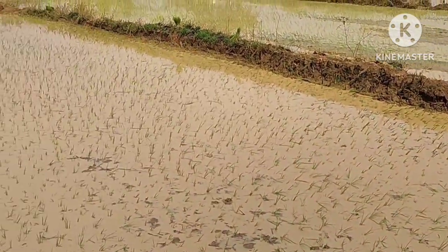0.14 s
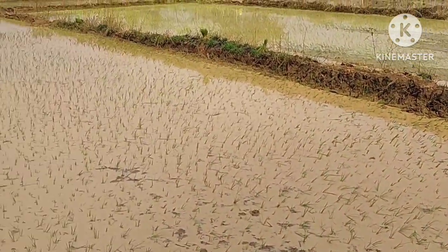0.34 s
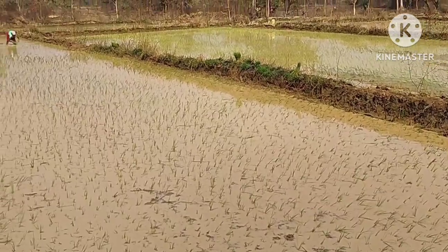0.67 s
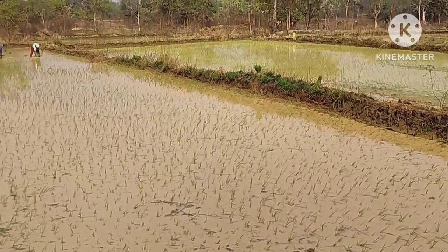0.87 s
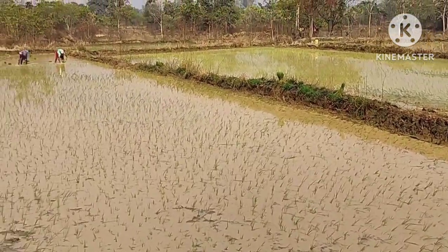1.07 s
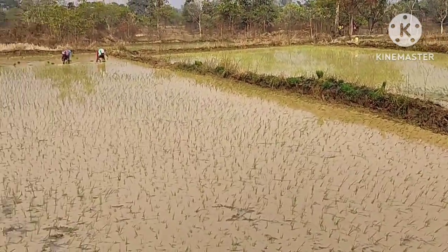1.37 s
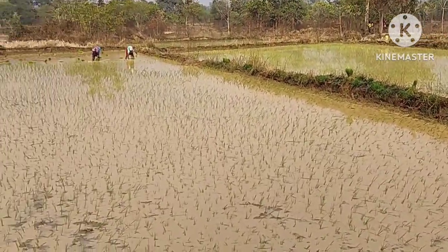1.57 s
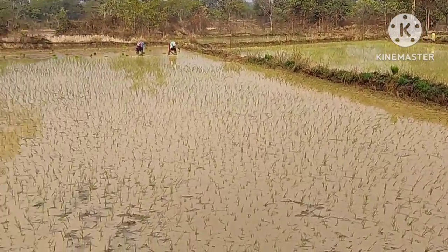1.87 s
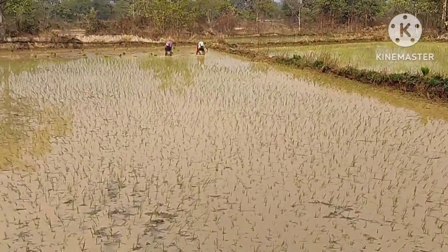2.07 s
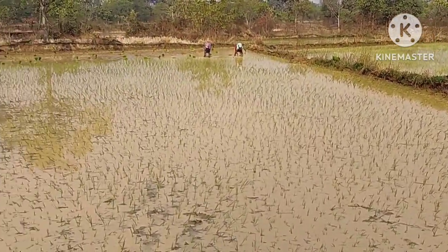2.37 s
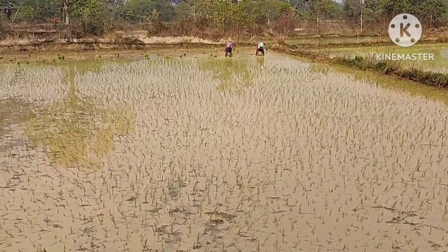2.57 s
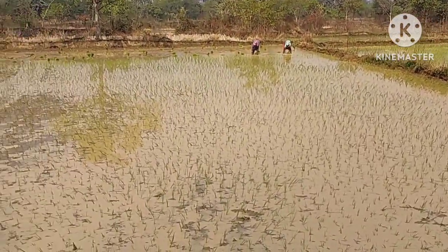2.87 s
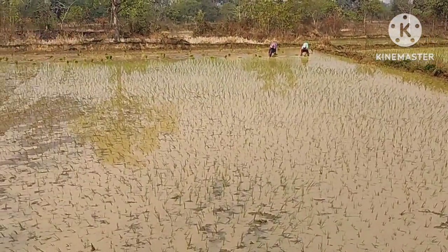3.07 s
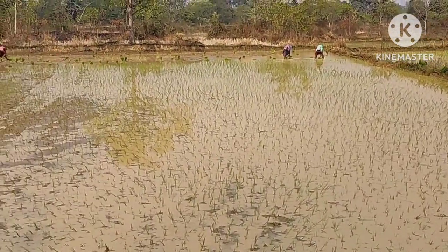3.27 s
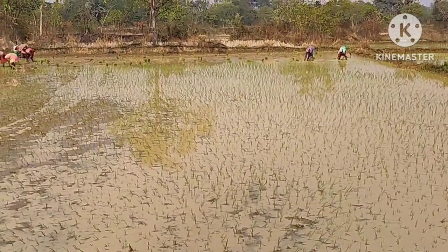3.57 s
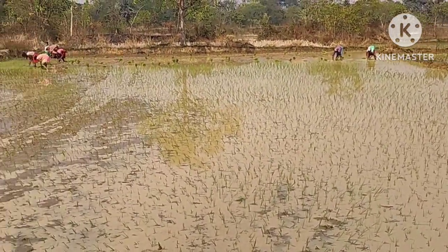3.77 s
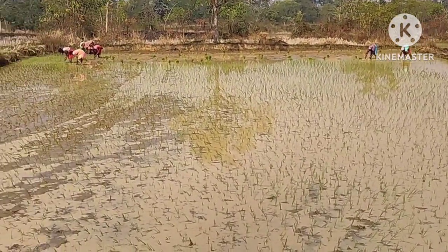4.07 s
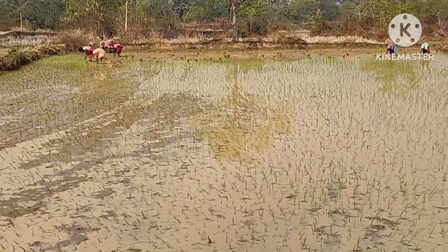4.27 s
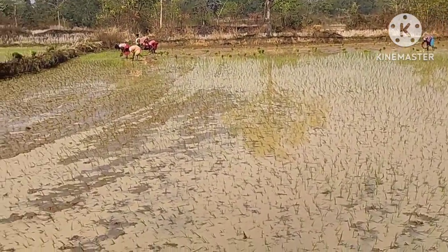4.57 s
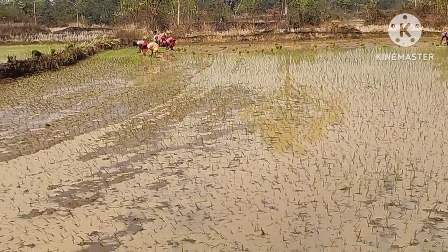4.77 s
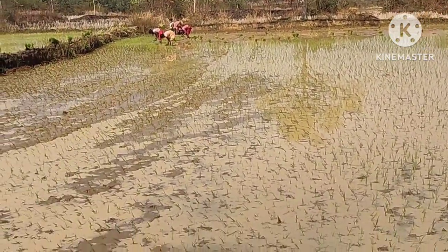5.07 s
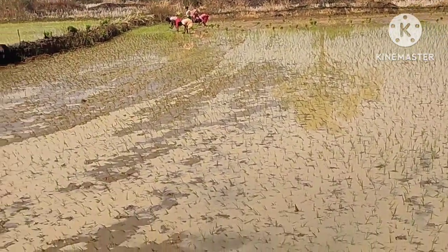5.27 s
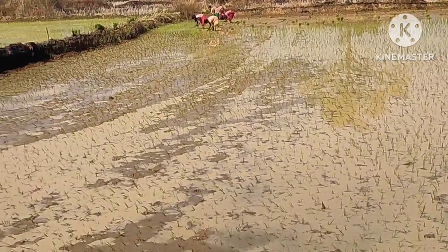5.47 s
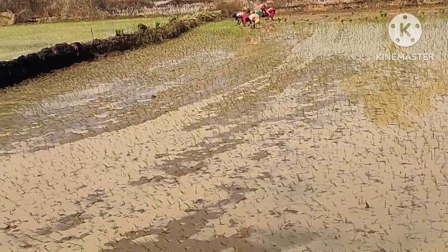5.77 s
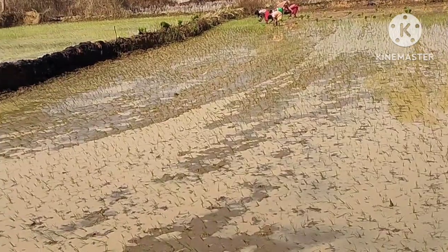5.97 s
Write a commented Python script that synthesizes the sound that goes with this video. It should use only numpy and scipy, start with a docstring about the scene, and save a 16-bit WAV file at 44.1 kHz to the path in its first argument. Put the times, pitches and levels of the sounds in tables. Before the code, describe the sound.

A small diesel engine chugs some way off across open fields, a rapid, even beat of metallic knocks and exhaust thumps. As the microphone slowly turns, the clatter grows a little louder and brighter on the right. Close by are low air, fine hiss and a few small ticks. Faint chirps and one hoarse squawk, probably birds, come from farther off, and a short snap follows about two thirds through.

```python
"""Diesel across flooded fields

A single-cylinder diesel chugs some way off, about 14 firings a second: a metallic knock, then an exhaust
thump with a gassy rasp, and a short tail scattered by the land. The microphone pair turns slowly, so the
clatter brightens on the right. Close by, over low air and fine hiss: a few ticks, a faint sizzle, one
snap, a soft bump of air. Farther off, thin chirps and a hoarse squawk, probably birds."""
import sys
import numpy as np
from scipy import signal
from scipy.fft import rfft, irfft, next_fast_len
from scipy.io import wavfile
from scipy.ndimage import uniform_filter1d

SR = 44100
rng = np.random.default_rng(int(sys.argv[2]) if len(sys.argv) > 2 else 0)


def unload_wav(signal):
    """Save mono or channel-first audio to the path in sys.argv[1] as 16-bit WAV at rate SR, clipped to [-1, 1]."""
    wavfile.write(
        sys.argv[1],
        SR,
        np.round(np.clip(np.atleast_2d(signal).T, -1, 1) * 32767).astype(np.int16),
    )


N = 270333
TIME = np.arange(N) / SR

# spectrum of the fine hiss: (frequency [Hz], relative level [dB])
HISS_SPECTRUM = [(2000, 6), (3500, 3), (5500, -1.5), (7200, 0), (8800, 3), (10500, 1), (15000, -1)]
# the hiss at the right microphone: (time [s], level [dB])
HISS_LEVEL = [(0, -82.5), (1.8, -75.5), (2.6, -78.5), (3.2, -74), (4.25, -75.5), (4.42, -71), (5.1, -75.5),
              (6.13, -72)]


def amp(db):
    """Decibels to gain."""
    return 10 ** (np.asarray(db) / 20)


def unit(x):
    """Scales to rms 1."""
    return x / np.sqrt(np.mean(x ** 2) + 1e-20)


def bell(x, spread):
    """A Gaussian of height 1 around zero."""
    return np.exp(-.5 * (x / spread) ** 2)


def wander(samples):
    """Random drift of rms 1, smoothed over so many samples."""
    return unit(uniform_filter1d(rng.standard_normal(N), size=samples))


def curve(rows):
    """Joins (time, value) rows by straight lines."""
    return np.interp(TIME, *np.transpose(rows))


def colour(x, points):
    """Filters by (frequency [Hz], gain [dB]) points on a log axis, rolling off above the last."""
    hz, db = np.transpose(points)
    size = next_fast_len(N + 4096)
    f = np.fft.rfftfreq(size, 1 / SR)
    gain = amp(np.interp(np.log(f + 1), np.log(hz), db)) / np.maximum(f / hz[-1], 1) ** 2
    return irfft(rfft(x, size) * gain, size)[..., :N]


def ring(x, hz, width):
    """One resonance of gain 1."""
    r = np.exp(-np.pi * width / SR)
    return signal.lfilter([1 - r, 0, r - 1], [1, -2 * r * np.cos(2 * np.pi * hz / SR), r * r], x)


def body(x, modes):
    """A set of resonances driven together."""
    return unit(sum(amp(db) * ring(x, hz, width) for hz, width, db in modes))


def clicks(times, sizes):
    """A train of single impulses."""
    at = np.round(times * SR).astype(int)
    inside = (at >= 0) & (at < N)
    return np.bincount(at[inside], sizes[inside], N)


def swing(centre, spread, hz, sag=0, crest=0):
    """A few rounded cycles that rise and fade, their pitch falling by sag [Hz/s]."""
    t = np.arange(SR // 16) / SR - centre
    return bell(t, spread) * np.cos(2 * np.pi * (hz * (t - crest) - .5 * sag * (t - crest) ** 2))


def struck(start, db, hz, decay, rise=.00026):
    """One ringing blow."""
    t = np.arange(SR // 8) / SR
    blow = amp(db) * np.exp(-t / decay) * (1 - np.exp(-t / rise)) * np.sin(2 * np.pi * hz * t)
    return np.pad(blow, (round(start * SR), N))[:N]


def swell(centre, spread, hz, slide, db):
    """A tone that rises and fades smoothly while its pitch slides [Hz/s]."""
    t = TIME - centre
    return amp(db) * bell(t, spread) * np.sin(2 * np.pi * (hz * TIME + .5 * slide * t ** 2))


def pair(x, left_db, lag=0):
    """Two microphones: the left one hears the sound at its own level, lag seconds later."""
    return np.array([amp(left_db) * np.interp(TIME - lag, TIME, x), x])


def flutter(x, depth_db):
    """Sound paths over the water interfere: narrow bands swell and fade from stroke to stroke."""
    bands = signal.stft(x, nperseg=1024, noverlap=768)[2]
    drift = rng.standard_normal(bands.shape)
    for _ in range(2):
        drift = uniform_filter1d(uniform_filter1d(drift, size=3, axis=0), size=11, axis=1)
    gain = amp(depth_db * np.clip(unit(drift), -2, 2))
    return signal.istft(bands * gain, nperseg=1024, noverlap=768)[1][:N]


def turned(x, heading, spectra):
    """A turning microphone: crossfades x through one (spectrum, level [dB]) for each of headings 0-2."""
    shares = [np.sqrt(np.maximum(1 - abs(heading - k), 0)) for k in range(len(spectra))]
    return sum(share * amp(db) * unit(colour(x, points)) for share, (points, db) in zip(shares, spectra))


def firings(first_cycle=.2994, jitter_s=.00017):
    """Moments of combustion, from one before the start; each is a little early or late."""
    # engine speed: (time [s], firing rate [1/s])
    speed = [(0, 14.266), (.55, 14.311), (2.7, 13.789), (3.2, 14.066), (4.3, 14.038), (4.75, 13.883),
             (5.3, 14.012), (6.13, 13.84)]
    cycles = np.cumsum(curve(speed)) / SR - first_cycle
    times = np.interp(np.arange(int(cycles[-1]) + 1), cycles, TIME)
    times = np.r_[2 * times[0] - times[1], times]
    return times + jitter_s * rng.standard_normal(len(times))


def uneven(times, spread_db):
    """No two firings are equally strong."""
    return amp(spread_db * rng.standard_normal(len(times)))


def bursts(times, exhaust_delay=.01595):
    """Envelope of the noise in each cycle: the knock, the opening exhaust valve, their scattered tail."""
    knock_rise, knock_decay = .0006, .03
    exhaust_rise, exhaust_decay, tail_decay = .0014, .0068, .065
    t = np.arange(SR // 5) / SR
    late = np.maximum(t - exhaust_delay, 0)
    knock = .58 * np.exp(-t / knock_decay) * (1 - np.exp(-t / knock_rise))
    exhaust = np.hypot(1.4 * np.exp(-late / exhaust_decay), .27 * np.exp(-late / tail_decay))
    exhaust *= 1 - np.exp(-late / exhaust_rise)
    train = clicks(times, uneven(times, spread_db=1.1))
    power = signal.oaconvolve(train, knock ** 2 + exhaust ** 2)[:N]
    return unit(np.sqrt(np.maximum(power, 0)))


def piston_knock(times, gate, heading, shade):
    """The piston slaps the block a few times in a row, a pitched tock; the block rings on faintly."""
    # blows in one knock: (delay [s], spread [s], pitch [Hz], relative level [dB], extra in shade [dB])
    blows = [(.0022, .0011, 1340, -2, -6), (.0066, .0024, 1015, 0, 5), (.0105, .0013, 1430, -8, -2)]
    # engine block resonances: (frequency [Hz], width [Hz], gain [dB])
    block_modes = [(1002, 40, 8), (1330, 38, -20)]
    slaps = np.zeros(N)
    for delay, spread, hz, db, shade_db in blows:
        train = clicks(times, uneven(times, spread_db=1.6))
        slaps += amp(db + shade_db * shade) * signal.oaconvolve(train, swing(delay, spread, hz))[:N]
    block = body(gate * rng.standard_normal(N), block_modes)
    dip = bell(heading - 1, spread=.37)  # weaker at the oblique heading, most of all on the left
    knock = amp(.5 * shade - 2.5 * dip) * unit(unit(slaps) + .3 * block)
    return pair(knock, left_db=-6 - 14 * dip, lag=.00033)


def exhaust_pipe(times, gate):
    """Gas pulses and their turbulence ring the pipe; scattered sound fills the gaps."""
    # gas pulses in one cycle: (delay [s], gain [ratio])
    puffs = [(.0002, 0.63), (.0085, 0.61), (0.0175, 1), (0.0313, 0.9), (.0445, 0.22), (0.0597, 0.77)]
    # pipe resonances: (frequency [Hz], width [Hz], gain [dB])
    pipe_modes = [(360, 26, 1.5), (446, 48, -1.5), (547, 60, -9)]
    pulses = unit(sum(clicks(times + delay, gain * uneven(times, spread_db=2)) for delay, gain in puffs))
    turbulence = .35 * (gate + 1) * rng.standard_normal(N)
    ringing = body(flutter(pulses + turbulence, depth_db=1.5), pipe_modes)
    spectrum = [(100, -22), (250, -7), (330, 1.5), (520, 2.5), (700, -22.5), (1200, -14)]
    return pair(unit(colour(ringing, spectrum)), left_db=.5, lag=.00049)


def grit(times, alike, count=12):
    """Noise that partly repeats from firing to firing; the pattern drifts as the echo paths change."""
    last_firing = times[np.searchsorted(times, TIME, "right") - 1]
    age = ((TIME - last_firing) * SR).astype(int)
    patterns = rng.standard_normal((count + 1, SR // 10))
    place = TIME / (N / SR) * count
    k, angle = place.astype(int), place % 1 * np.pi / 2
    repeating = np.cos(angle) * patterns[k, age] + np.sin(angle) * patterns[k + 1, age]
    return np.sqrt(alike) * repeating + np.sqrt(1 - alike) * rng.standard_normal(N)


def clatter(times, gate, heading, shade, lag, shade_db=-16):
    """Clatter and gas rasp: bright at the microphone that faces the engine, shaded at the other."""
    # right microphone at each heading: (frequency [Hz], relative level [dB])
    right_away = [(200, -14), (400, -6), (660, -4), (880, -3.5), (1060, 3), (1200, 2), (1480, 3.5),
                  (1720, -7), (1900, -3), (2150, -2), (2500, -5), (2800, -6), (3000, -3), (3150, -9),
                  (3550, -10), (4200, -20), (7000, -31)]
    right_oblique = [(200, -19), (400, 2), (650, -3.5), (1000, 6.5), (1400, 3.5), (1600, 6.5), (1790, -1),
                     (1920, 8.5), (2150, -2), (2400, -6), (2580, 1.5), (2850, -25.5), (3100, -18.5),
                     (3400, -22.5), (4200, -32)]
    right_toward = [(200, -22), (400, -0.5), (700, -0.5), (1150, -10), (1310, 8.5), (1450, -5.5), (1600, 3),
                    (1780, -17), (1930, 0), (2120, 9.5), (2350, 0.5), (2550, 4), (2800, 1), (2950, 2.5),
                    (3250, -14.5), (3850, -15), (4300, -26.5)]
    # shaded left microphone at each heading: (frequency [Hz], relative level [dB])
    left_away = [(200, -5), (550, 1), (850, -1), (1300, 0), (1700, -4), (2000, -3), (2600, -10), (2900, -9),
                 (3100, -17), (4200, -20), (7000, -30)]
    left_oblique = [(200, 4), (550, 15), (750, 0.5), (1200, 10), (1400, 6), (1580, -3), (1800, -5.5),
                    (2000, 1), (2200, -13), (2600, -12), (2800, -37), (4200, -12), (7000, -17)]
    left_toward = [(200, -8), (550, 20), (750, 11), (1250, 4), (1500, -1), (1950, 0), (2150, 5), (2300, 2),
                   (2550, -18), (3000, -28), (4200, -25), (7000, -22)]
    # clatter against the engine's level, before shading: (time [s], gain [dB])
    balance = [(0, -1.5), (1.7, -5.5), (2.4, -5.5), (2.7, -9), (2.9, -4.5), (3.5, -3.5), (4.15, -10.5),
               (4.8, -8), (5.25, -9.5), (5.45, -11.5), (5.65, -9.5), (5.82, -7.5), (6, -7.5), (6.13, -5.5)]
    near_side = flutter(gate * grit(times, alike=.6), depth_db=4.5)
    far_side = flutter(gate * grit(times, alike=.35), depth_db=4.5)
    delayed = np.interp(TIME - lag, TIME, .56 * near_side + .86 * far_side)
    left = turned(delayed, heading, [(left_away, -3), (left_oblique, -7.5), (left_toward, -8.5)])
    right = turned(near_side, heading, [(right_away, 4.8), (right_oblique, .9), (right_toward, 1.3)])
    return amp(curve(balance) + shade_db * shade) * np.array([left, right])


def panel_pings(times, gate, heading, lag, delay=.019):
    """Thin panels ring briefly at each exhaust stroke; each stands out at its own heading."""
    # engine panels: (pitch [Hz], width [Hz], relative level [dB], clearest heading [0-2], spread [same])
    panels = [(2980, 33, -23.5, 0.18, 0.11), (3140, 30, -23.5, 0.42, 0.047), (3580, 38, -34, 0.48, 0.075),
              (3600, 33, -29.5, 1.834, 0.1)]
    out = np.zeros(N)
    for hz, width, db, clearest, spread in panels:
        blows = unit(clicks(times + delay, uneven(times, spread_db=2)))
        blows += .22 * gate * rng.standard_normal(N)
        ping = unit(ring(ring(blows, hz, width), hz, 3 * width))
        out += amp(db) * bell(heading - clearest, spread) * ping
    return pair(out, left_db=-21, lag=lag)


def exhaust_thump(times, lag):
    """Each puff swings the silencer for about a cycle and a half, falling in pitch; the banks echo it."""
    # direct path and echoes off the banks: (delay [s], gain [ratio])
    paths = [(0, 0.73), (0.012, 0.04), (0.0228, 0.14), (0.0414, 0.085)]
    force = uneven(times, spread_db=.5)
    train = sum(clicks(times + delay, gain * force) for delay, gain in paths)
    puff = swing(centre=.0222, spread=.005, hz=110, sag=3000, crest=.0011)
    return pair(unit(signal.oaconvolve(train, puff)[:N]), left_db=0, lag=lag)


def engine(clear_heading=1.74):
    """The diesel across the water, every part timed by its firings, heard by the turning pair."""
    # the engine at the microphones: (time [s], base level [dB])
    loudness = [(0, -57.5), (.7, -52), (1.8, -49.5), (3.3, -49), (4, -47.5), (5.3, -49), (6.13, -48)]
    # aim of the right microphone: (time [s], heading [0 away, 1 oblique, 2 facing the engine])
    aim = [(0, 0.086), (1.3, 0.39), (2.0, 0.72), (2.7, 1.29), (3.4, 1.14), (4.2, 1.89), (6.13, 1.81)]
    heading = curve(aim)
    shade = np.maximum(1 - heading / clear_heading, 0)
    lag = np.linspace(.00038, .00012, N)  # the left microphone's delay shrinks as the pair turns
    times = firings()
    gate = bursts(times)
    pipe = amp(-12) * exhaust_pipe(times, gate)
    knock = amp(-11.5) * piston_knock(times, gate, heading, shade)
    rasp = clatter(times, gate, heading, shade, lag)
    pings = panel_pings(times, gate, heading, lag)
    thump = amp(-.6) * exhaust_thump(times, lag)
    return amp(curve(loudness)) * (knock + pipe + rasp + pings + thump)


def field_air():
    """Low moving air, nearly alike in both microphones, and a fine, gently rustling hiss that is not."""
    # air over the fields: (frequency [Hz], relative level [dB])
    air_spectrum = [(10, -15), (25, -10), (45, -2), (80, -.5), (160, -10), (250, -16), (400, -18),
                    (700, -25), (1500, -29), (3000, -33.5), (5000, -65)]
    shared, own, fine = rng.standard_normal(N), rng.standard_normal((2, N)), rng.standard_normal((2, N))
    air = amp(np.linspace(-60.5, -56, N)) * unit(colour(shared + .35 * own, air_spectrum))
    rustle_db = 1.5 * wander(samples=1300)
    hiss = amp(curve(HISS_LEVEL) + rustle_db) * unit(colour(fine, HISS_SPECTRUM))
    return air * amp([[1], [-1]]) + hiss * amp([[-3.5], [0]])


def crackle(most_per_s=40, db=-89, decay=.0049):
    """Faint stray ticks scattered through the hiss, more of them as the hiss grows."""
    hiss_db = curve(HISS_LEVEL)
    busy = amp(hiss_db - hiss_db.max())
    sizes = amp(2.2 * np.minimum(rng.exponential(1, N), 3))
    hits = rng.random(N) < busy * most_per_s / SR
    fade = signal.oaconvolve(sizes * hits * busy, np.exp(-np.arange(SR // 20) / SR / decay))[:N]
    return amp(db) * unit(colour(fade * rng.standard_normal((2, N)), HISS_SPECTRUM)) * amp([[-3], [0]])


def ticks(width_share=.26, rise=.0012):
    """Small ticks close by: dying bursts of noise through one resonance each, with a broad crack."""
    # ticks: (time [s], level before colouring [dB], pitch [Hz], decay [s], left against right [dB])
    taps = [(.198, -67.5, 10700, 0.02, -13), (.7215, -64, 8300, 0.0029, 8.5),
            (1.1215, -71, 8050, 0.0024, 16), (1.4115, -60, 4900, 0.0032, -5),
            (1.8205, -59, 10500, 0.0025, -17), (3.128, -46, 9490, 0.013, -9),
            (4.076, -62, 9500, 0.0044, -3), (4.963, -51.5, 3750, 0.0096, -13),
            (4.989, -46, 3400, 0.0044, -21), (5.094, -77, 8000, 0.0035, 13), (5.479, -55, 9060, 0.0036, -8)]
    t = np.arange(SR // 6) / SR
    out = np.zeros((2, N))
    for start, db, hz, decay, left_db in taps:
        noise = rng.standard_normal(len(t))
        tone = unit(ring(ring(noise, hz, width_share * hz), hz, width_share * hz))
        crack = min(hz / 9000, 1) ** 2 * noise  # low rings are softer
        fade = np.exp(-t / decay) * (1 - np.exp(-t / rise))
        tick = amp(db) * unit((tone + crack) * fade) * np.sqrt(np.mean(fade ** 2))
        part = out[:, round(start * SR):][:, :len(t)]
        part += amp([[left_db], [0]]) * tick[:part.shape[1]]
    return colour(out, [(1500, -16), (3500, 2), (4300, -11), (5500, -.5), (16000, -2.5)])


def clacks():
    """Now and then an exhaust stroke reaches the right microphone as a hard, ringing clack."""
    # the hardest strokes: (time [s], level [dB], pitch [Hz])
    strokes = [(0.805, -58, 3000), (1.019, -59, 3100), (1.23, -62, 3270), (1.373, -46, 810),
               (1.582, -54.5, 3565), (1.724, -48.5, 1580), (1.799, -53, 1566), (2.012, -42.5, 1605),
               (2.155, -42.5, 1595), (2.806, -39, 2043), (3.02, -42, 2070), (3.235, -40, 2000),
               (3.448, -44, 1476), (5.09, -43, 1510), (5.235, -40.5, 2504), (5.739, -41, 1477),
               (5.806, -34, 2148), (5.877, -37, 2563), (6.094, -32.5, 1620)]
    return pair(sum(struck(*stroke, decay=.0079, rise=.0027) for stroke in strokes), left_db=-24)


def chirps():
    """Thin chirps far off to the right, probably birds: short tones, level or falling."""
    # notes: (centre [s], spread [s], pitch [Hz], slide [Hz/s], level [dB])
    notes = [(0.898, 0.019, 2380, -2000, -72), (1.283, 0.019, 2235, -2000, -63),
             (2.172, 0.033, 1957, 0, -66), (3.776, 0.0091, 3350, 0, -56.5), (3.832, 0.024, 3390, 0, -63.5)]
    return pair(sum(swell(*note) for note in notes), left_db=-23)


def squawk(centre=3.652, hz=808, sag_hz_per_s=530, db=-51):
    """A hoarse call farther off, probably a bird: a falling, unsteady pitch inside a longer rasp."""
    # the first three harmonics: (relative level [dB])
    harmonics = [0, -0.5, -5.5]
    t = TIME - centre
    pitch = (hz - sag_hz_per_s * t) * (1 + .035 * wander(samples=100))
    phase = 2 * np.pi * np.cumsum(pitch) / SR
    tone = unit(sum(gain * np.sin(k * phase) for k, gain in enumerate(amp(harmonics), 1)))
    tone *= bell(t, spread=.015)
    rasp_spectrum = [(150, -10), (280, -1), (900, -21), (1300, -11), (1800, -12), (2050, -7),
                     (2370, 1), (2650, -22), (4500, -33)]
    rasp = amp(1) * unit(colour(rng.standard_normal(N), rasp_spectrum)) * bell(t, spread=.035)
    return amp(db) * (pair(tone, left_db=-6.5) + pair(rasp, left_db=-10))


def sizzle(hz=8430, width=490):
    """A faint, high, broken sizzle to the left, perhaps an insect."""
    # the sizzle at the right microphone: (time [s], level [dB])
    level = [(4.1, -115), (4.45, -89), (5.0, -96), (5.6, -95), (5.9, -115)]
    band = ring(ring(rng.standard_normal(N), hz, width), hz, width)
    broken = amp(5 * np.clip(wander(samples=3000), -3, 1))
    return pair(amp(curve(level)) * unit(band * broken), left_db=6)


def snap(crunch_decay=.026, scatter_decay=.024, edge_decay=.034):
    """Rings climb in pitch over a low thud and a crisp-edged crunch, roughened by close reflections."""
    # the snap's quick blows: (time [s], level before colouring [dB], pitch [Hz], rise [s])
    blows = [(4.352, -31.5, 2020, 0.00025), (4.3545, -37, 2270, 0.0026), (4.3576, -35.5, 2590, .0004),
             (4.366, -28, 3284, 0.0021), (4.366, -43.5, 890, 0.0012)]
    start = blows[0][0]
    age = TIME - start
    rings = sum(struck(at, db, hz, decay=.0035, rise=rise) for at, db, hz, rise in blows)
    grain_spectrum = [(100, -16), (290, -8), (600, -13), (1500, 6), (2300, 18), (2800, 9),
                      (3250, 2), (3800, -8), (4500, -22)]
    grain = unit(colour(rng.standard_normal(N), grain_spectrum))
    crunch = amp(-42) * grain * (age > 0) * np.exp(-abs(age) / crunch_decay)
    thud = struck(start, db=-36, hz=248, decay=.0062)
    direct = pair(rings + crunch, left_db=-18) + thud
    t = np.arange(SR // 12) / SR
    scatter = rng.standard_normal((2, len(t))) * np.exp(-t / scatter_decay)
    reflected = signal.oaconvolve(direct, scatter / np.linalg.norm(scatter[0]), axes=1)[:, :N]
    crisp = unit(colour(rng.standard_normal((2, N)), [(6000, -16), (7600, 5), (11000, 1), (15000, -5)]))
    edge = amp(-66) * crisp * (age > 0) * np.exp(-abs(age) / edge_decay)
    return colour(direct + amp(-8) * reflected, [(3500, 2.5), (4800, -3), (9000, -18)]) + edge


def air_bump():
    """A soft, low bump of air, mostly on the left microphone."""
    return pair(swell(centre=4.79, spread=.024, hz=34, slide=0, db=-55), left_db=8)


def scene():
    """The distant engine, the air and small sounds around the microphones, the calls farther off."""
    diesel = engine() + clacks()
    nearby = field_air() + ticks() + crackle() + sizzle() + snap() + air_bump()
    return diesel + nearby + chirps() + squawk()


def record(dry, edge_hz=15500):
    """The recorder's band limit."""
    lowpass = signal.firwin(511, edge_hz, window=("kaiser", 9), fs=SR)
    return signal.oaconvolve(dry, lowpass[None], "same")


dry = scene()
out = record(dry)
unload_wav(out)
```